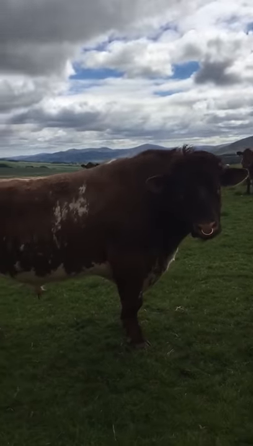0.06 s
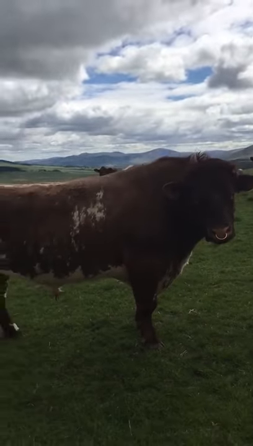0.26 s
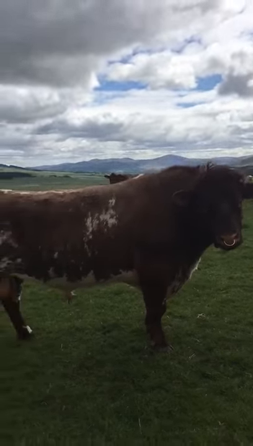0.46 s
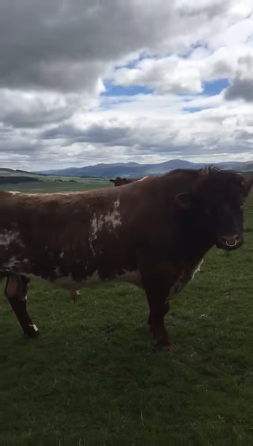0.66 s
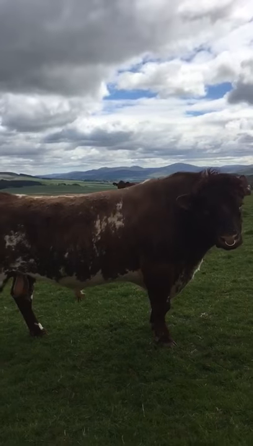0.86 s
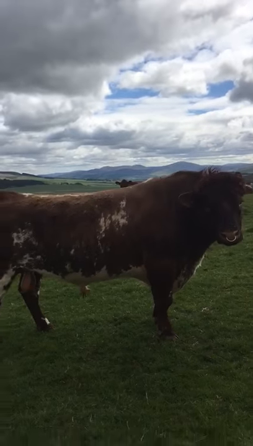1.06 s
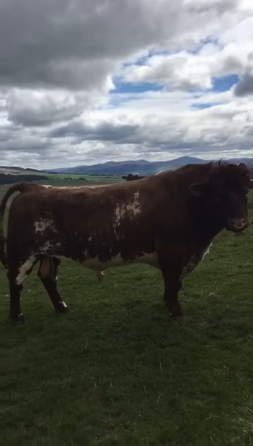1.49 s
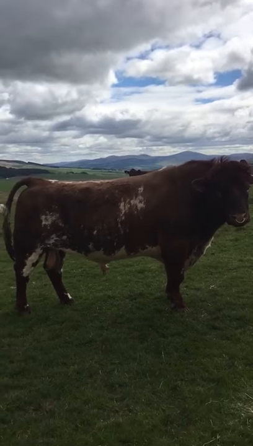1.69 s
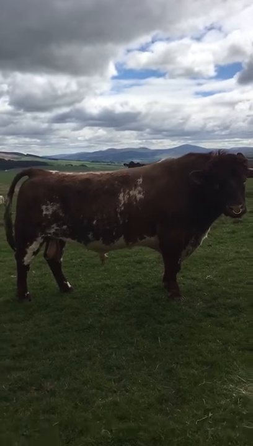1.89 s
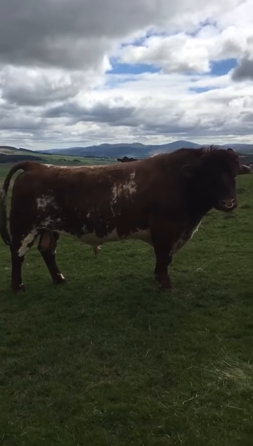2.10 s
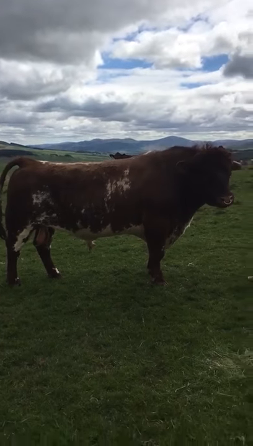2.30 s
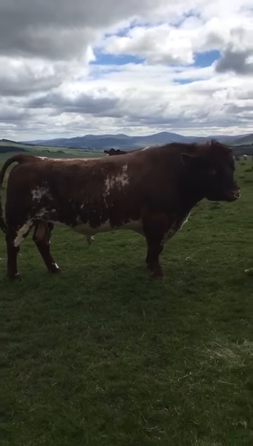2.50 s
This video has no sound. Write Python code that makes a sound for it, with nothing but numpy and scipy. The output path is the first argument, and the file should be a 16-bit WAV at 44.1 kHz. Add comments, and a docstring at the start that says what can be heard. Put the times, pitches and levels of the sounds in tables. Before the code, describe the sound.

A bull gives one long, thin, nasal bellow behind wind buffeting the microphone.

```python
"""A windy pasture on one mono microphone, with a bull heard behind the wind on the capsule.
At the start an earlier hoarse call dies away; grass rustles faintly and eddies slap the microphone.
The bull draws air, the turf scuffs once, and at 1.7 s he gives one long, thin, nasal bellow:
his vocal folds creak slowly, lock onto a steady pitch and turn raspy as the call fades.
The wind rumbles on to the end."""
import sys
import numpy as np
from scipy import signal
from scipy.io import wavfile
from scipy.ndimage import uniform_filter1d

SR = 44100
rng = np.random.default_rng(int(sys.argv[2]) if len(sys.argv) > 2 else 0)


def unload_audio(sound):
    """Save the sound as a 16-bit wav file, at the path given as the first command line argument."""
    columns = np.transpose(np.atleast_2d(sound))
    # keep every value between -1 and 1, then stretch to whole-number steps
    steps = np.round(np.clip(columns, -1, 1) * 32767)
    wavfile.write(sys.argv[1], SR, steps.astype(np.int16))


N = 116865
T = np.arange(N) / SR


def amp(db):
    """Decibels to gain."""
    return 10 ** (np.asarray(db) / 20)


def unit(x):
    """Scales to rms 1."""
    return x / np.sqrt(np.mean(x ** 2) + 1e-20)


def curve(rows):
    """Every column of a timed table, drawn at each sample."""
    times, *columns = np.transpose(rows)
    return [np.interp(T, times, column) for column in columns]


def colour(x, points, size=16384):
    """Minimum-phase filter through the given (Hz, dB) points."""
    hz, db = np.transpose(points)
    bin_hz = abs(np.fft.fftfreq(size, 1 / SR))
    log_gain = np.log(amp(np.interp(np.log(bin_hz + 1), np.log(hz), db)))
    response = np.exp(np.conj(signal.hilbert(log_gain)))
    taps = np.fft.ifft(response).real[:size // 2]
    return signal.fftconvolve(x, taps)[:len(x)]


def noise(points):
    """Steady noise of the given colour, rms 1."""
    return unit(colour(rng.standard_normal(N + SR), points)[SR:])


def levelled(x, steady_s=0.07):
    """Takes the slow swings out of a noise, leaving its quick lumps."""
    window = signal.windows.hann(2 * int(steady_s * SR) + 1)
    return x / np.sqrt(signal.fftconvolve(x ** 2, window / window.sum(), "same") + 1e-6)


def flicker(spread_db, samples):
    """A random gain that wavers over the given number of samples."""
    return amp(spread_db * unit(uniform_filter1d(rng.standard_normal(N), samples)))


def swell(centre_s, length_s, db):
    """A bell-shaped envelope centred on a moment."""
    return amp(db) * np.exp(-2 * ((T - centre_s) / length_s) ** 2)


def add(mix, start_s, sound):
    """Mixes a sound in at a time."""
    part = mix[max(round(start_s * SR), 0):][:len(sound)]
    part += sound[:len(part)]


# Gusts on the capsule. Each row: time in seconds, rumble level in dB, flutter level in dB.
WIND_LEVELS = [(0, -32.5, -46), (.1, -37, -50.5), (.21, -34.5, -52.5), (.245, -12, -38.5),
               (.28, -25.5, -54), (.315, -29.5, -57.5), (.385, -13, -41.5), (.45, -26, -45),
               (.53, -26.5, -45.5), (.58, -14.5, -38), (.63, -19.5, -42.5), (.7, -21.5, -32.5),
               (.75, -23, -39.5), (.82, -8.5, -18.5), (.87, -16.5, -28), (.93, -24, -38.5),
               (1.025, -15.5, -26), (1.15, -22, -38), (1.2, -17, -40.5), (1.28, -23, -47),
               (1.39, -24.5, -34.5), (1.45, -19.5, -42.5), (1.56, -17.5, -41), (1.6, -30.5, -52),
               (1.64, -21, -43), (1.74, -24.5, -40), (1.83, -35, -50), (1.905, -23, -32.5),
               (1.94, -14, -23.5), (2.01, -11.5, -22.5), (2.055, -25.5, -50.5), (2.09, -18.5, -31),
               (2.14, -22, -41), (2.19, -17, -21), (2.25, -18, -34.5), (2.305, -31, -37.5),
               (2.35, -11.5, -29), (2.41, -43, -53.5), (2.47, -25.5, -42), (2.55, -35.5, -47),
               (2.65, -30, -51.5)]
# The wind's two colours. Each row: frequency in Hz, gain in dB.
RUMBLE_COLOUR = [(12, -20), (25, -16), (38, -14), (55, 0.5), (75, -4.5), (110, -8.5), (150, -13),
                 (220, -24.5), (400, -50.5), (900, -89.5)]
FLUTTER_COLOUR = [(70, -28), (140, -2.5), (230, 3), (330, -4.5), (480, -13), (700, -18.5), (1000, -30),
                  (1500, -36), (2500, -53.5), (5000, -66.5)]

def wind():
    """Wind right on the microphone: lumpy rumble, with a brighter flutter that flares on its crests."""
    rumble_db, flutter_db = curve(WIND_LEVELS)
    rumble = levelled(noise(RUMBLE_COLOUR))
    crests = abs(signal.hilbert(rumble)) + 0.2
    flares = flicker(spread_db=2.2, samples=int(.012 * SR))
    flutter = colour(crests * flares * rng.standard_normal(N), FLUTTER_COLOUR)
    return amp(rumble_db) * rumble + amp(flutter_db) * levelled(unit(flutter))


# The end of an earlier call. Each row: time in seconds, level in dB.
HOARSE_LEVELS = [(0, -55), (.17, -56), (.26, -60.5), (.33, -81), (.45, -65.5), (.58, -60.5), (.75, -64.5),
                 (.9, -64.5), (1.1, -80.5), (1.3, -76)]
# The throat that shapes it. Each row: frequency in Hz, gain in dB.
HOARSE_THROAT = [(600, -12), (1100, -9.5), (1350, -2), (1620, -6), (1730, 3), (1840, -6), (2000, -20.5),
                 (2250, -18.5), (2650, -11), (3130, -7.5), (3450, -18.5), (4200, -23), (4380, -16.5),
                 (4560, -30.5), (4900, -40)]

def hoarse_call():
    """Unvoiced air through the bull's throat, dying away behind the wind."""
    return amp(curve(HOARSE_LEVELS)[0]) * noise(HOARSE_THROAT)


# The pasture's background. Each row: frequency in Hz, gain in dB.
AIR_COLOUR = [(100, 10), (1000, 11.5), (2500, 2.5), (5000, -12.5), (7500, -9.5), (9400, -4.5),
              (10600, -16.5), (12000, -27)]

def field_air(level_db=-63):
    """The still air of the field, a steady hush under everything."""
    return amp(level_db) * noise(AIR_COLOUR)


# Rustles in the grass. Each row: centre in seconds, length in seconds, level in dB.
GRASS_RUSTLES = [(0.034, 0.12, -66), (0.198, 0.065, -65), (0.567, 0.064, -66), (0.718, 0.12, -72.5),
                 (0.896, 0.087, -65.5), (1.044, 0.17, -70.5), (1.25, 0.069, -68.5), (1.443, .025, -56),
                 (2.11, 0.084, -65), (2.6, .12, -75)]
# Their hiss. Each row: frequency in Hz, gain in dB.
GRASS_COLOUR = [(1500, -13), (3500, -2), (6000, 1.5), (7500, 0.5), (9400, 5.5), (10400, 2.5), (11500, 1)]

def grass():
    """Grass rustles in soft, grainy swishes, faint at the microphone."""
    swishes = sum(swell(*row) for row in GRASS_RUSTLES)
    grains = flicker(spread_db=4, samples=90)
    return swishes * unit(grains * noise(GRASS_COLOUR))


# Single eddies on the capsule. Each row: start in seconds, gain in dB, pitch in Hz.
EDDIES = [(.132, -15.5, 170), (0.234, -9, 75), (0.341, -21, 167), (0.374, -3.5, 58), (.481, -15.5, 200),
          (.567, -23, 292), (0.572, -7, 60.2), (.644, -18, 230), (.686, -12.5, 185), (0.766, -23.5, 240),
          (.805, -2.5, 110), (.8093, 7.5, 380), (0.8123, -0.5, 844), (0.8137, -3, 130), (0.8225, -7.5, 130),
          (.951, -14.5, 260), (.989, -35, 260), (1.037, -14, 300), (1.058, -22.5, 230), (1.104, -15, 260),
          (1.142, -31, 250), (1.207, -16.5, 210), (1.254, -23, 290), (1.41, -19.5, 290),
          (1.461, -12.5, 560), (1.548, -14.5, 248), (1.627, -17.5, 260), (1.73, -26.5, 400),
          (1.979, -11, 294), (2.011, -12.5, 270), (2.184, -1, 142), (2.211, -17, 300), (2.324, -26, 300)]

def buffets(rise_cycles=0.077, decay_cycles=.62, top_hz=1900):
    """Each eddy slaps the microphone with a pressure kick that dies within a cycle or two."""
    kicks = np.zeros(N)
    for start_s, db, hz in EDDIES:
        cycles = hz * T[:SR // 10]
        envelope = np.exp(-cycles / decay_cycles) * (1 - np.exp(-cycles / rise_cycles))
        add(kicks, start_s, amp(db) * np.sin(2 * np.pi * cycles) * envelope)
    return signal.sosfilt(signal.butter(4, top_hz, fs=SR, output="sos"), kicks)


# The bull's breath. Each row: time in seconds, level in dB.
INTAKE_LEVELS = [(1.18, -72.5), (1.28, -64), (1.35, -54.5), (1.42, -56), (1.54, -52.5), (1.66, -58),
                 (1.8, -58.5), (2.1, -58.5), (2.25, -67)]
# His airway. Each row: frequency in Hz, gain in dB.
AIRWAY_COLOUR = [(1200, 2.5), (2100, -5.5), (2600, 4), (3050, -6), (3650, -10.5), (4550, 0), (4950, -7.5),
                 (5650, -1.5), (6250, -9), (8000, -11), (8750, -8), (10400, -13), (12000, -17)]

def intake():
    """The bull draws air through throat and nostrils; the hiss lingers under the bellow."""
    return amp(curve(INTAKE_LEVELS)[0]) * noise(AIRWAY_COLOUR)


# Scuffed turf. Each row: frequency in Hz, gain in dB.
TURF_COLOUR = [(500, -17), (1000, 6), (1600, 8), (2300, -2), (3200, -21), (6000, -35)]

def scuff():
    """One short, dull scuff down in the turf."""
    return swell(centre_s=1.35, length_s=.018, db=-49) * noise(TURF_COLOUR)


# Unevenness of the fold pulses. Each row: time in seconds, scale of the unevenness in dB.
PULSE_UNEVENNESS = [(1.72, .3), (1.755, 2.6), (1.82, 2), (1.87, 1.2), (1.93, .5), (2.2, .4), (2.4, .8),
                    (2.65, 1)]

def fold_pulses(times, jitter_s=.000014, third_pulse_drop=2.5):
    """The vocal folds give one sharp, uneven pulse a cycle, every third one weaker."""
    uneven_db = np.interp(times, *np.transpose(PULSE_UNEVENNESS))
    strength, shift = rng.standard_normal((len(times), 2)).T
    every_third = np.arange(len(times)) % 3 == 1
    strength = np.clip(strength, -2, 1) - third_pulse_drop * every_third
    pulses, offsets = np.zeros(N), np.arange(-20, 21)
    for time_s, db in zip(times + jitter_s * shift, uneven_db * strength):
        samples = round(time_s * SR) + offsets
        pulse = np.sinc(samples - time_s * SR) * np.hanning(len(offsets))  # can fall between samples
        add(pulses, samples[0] / SR, amp(db) * pulse)
    return pulses


# The creaky start, then the held note's rise and fall. Each row: time in seconds, pulse rate in Hz.
CREAK_PITCH = [(1.698, 52), (1.734, 60), (1.749, 68), (1.7495, 120), (1.757, 128), (1.759, 146),
               (1.78, 141), (1.825, 144)]
RISING_PITCH = [(1.85, 145.4), (1.882, 144.3), (2.02, 147.2), (2.054, 146.8), (2.1, 148.4), (2.14, 147.6)]
FALLING_PITCH = [(2.17, 147.0), (2.268, 144.8), (2.476, 144.2), (2.5, 145.3), (2.526, 143.2),
                 (2.574, 143.8), (2.612, 142.1), (2.65, 142.0)]
# The voice at the microphone. Each row: time in seconds, then main, upper and bright levels in dB.
VOICE_LEVELS = [(1.69, -45.5, -61, -68), (1.755, -39, -47, -48.5), (1.785, -39.5, -63, -59.5),
                (1.835, -37.5, -53.5, -50), (1.92, -36, -52.5, -69.5), (1.99, -39, -50, -68),
                (2.12, -40, -62, -66), (2.22, -44.5, -65, -69), (2.31, -47.5, -70.5, -71.5),
                (2.45, -49.5, -69.5, -72), (2.57, -45.5, -58, -75), (2.65, -51, -65, -77)]
# Its rougher side. Each row: time in seconds, then wheeze, rasp and nasal levels in dB.
ROUGH_LEVELS = [(1.69, -61.5, -54, -73), (1.81, -72, -41.5, -58.5), (1.93, -86.5, -49.5, -71),
                (2.2, -71.5, -77, -63), (2.29, -70.5, -56, -84), (2.42, -59, -48.5, -59),
                (2.49, -61, -49.5, -64), (2.55, -66.5, -47.5, -55), (2.6, -67, -46, -51.5),
                (2.65, -59, -47.5, -49)]
# Resonances of throat and nose for those six layers. Each row: frequency in Hz, gain in dB.
MAIN_COLOUR = [(300, -43), (1040, -33.5), (1170, -18), (1315, 7.5), (1460, -2), (1600, -2), (1760, 6.5),
               (1900, -2), (2050, -5.5), (2220, -6), (2400, -19.5), (3000, -56)]
UPPER_COLOUR = [(1800, -42), (2400, -3.5), (2700, 3), (3050, -8), (3450, -9.5), (3950, -23.5), (4450, -23),
                (4950, -35), (12000, -41)]
BRIGHT_COLOUR = [(2200, -46), (3000, -12), (3300, 11), (3600, 8), (3950, -7), (4400, 0.5), (4700, -19),
                 (5000, -30), (5700, -17.5), (9000, -22), (12000, -46.5)]
WHEEZE_COLOUR = [(4200, -31), (5100, -29), (5550, 5.5), (5900, -1.5), (6250, -10), (6700, -0.5), (7100, -9),
                 (7600, -28), (9500, -12.5), (12000, -50)]
RASP_COLOUR = [(500, -38), (1000, -13.5), (1130, -5.5), (1290, 3.5), (1650, -5.5), (1950, -4), (2250, -16),
               (3200, -18), (4200, -26.5), (8000, -40.5)]
NASAL_COLOUR = [(300, -57), (480, -25.5), (585, -3), (720, -15), (1000, -55)]

def bellow(start_s=1.697, puff_decay_cycles=.3, puff_floor=.35, wheeze_air=.45):
    """Out in the pasture, fold pulses ring the bull's throat; puffs of air in each cycle add the rasp."""
    calling = T >= start_s
    pitch_hz = curve([*CREAK_PITCH, *RISING_PITCH, *FALLING_PITCH])[0]
    cycles = np.cumsum(pitch_hz * calling) / SR
    pulse_times = np.interp(np.arange(int(cycles[-1]) + 1), cycles[calling], T[calling])
    pulses = fold_pulses(pulse_times)
    airflow = puff_floor + np.exp(-(cycles % 1) / puff_decay_cycles)
    puffs = calling * airflow * rng.standard_normal(N)
    breathy_pulses = unit(pulses) + wheeze_air * unit(puffs)
    main_db, upper_db, bright_db = curve(VOICE_LEVELS)
    wheeze_db, rasp_db, nasal_db = curve(ROUGH_LEVELS)
    layers = [(pulses, MAIN_COLOUR, main_db),
              (pulses, UPPER_COLOUR, upper_db),
              (pulses, BRIGHT_COLOUR, bright_db),
              (breathy_pulses, WHEEZE_COLOUR, wheeze_db),
              (puffs, RASP_COLOUR, rasp_db),
              (pulses, NASAL_COLOUR, nasal_db)]
    voice = sum(amp(db) * unit(colour(drive, shape)) for drive, shape, db in layers)
    return np.sqrt(calling.mean()) * voice  # the levels are rms over the call alone


def scene():
    """The wind, the field and the bull, as they reach one microphone."""
    return (wind() + hoarse_call() + field_air() + grass() + buffets() + intake() + scuff() + bellow())[None]


def record(dry, low_cut_hz=26.5, headroom=.98, top_hz=12000):
    """The microphone's low cut, its soft overload in the hardest buffet, and its treble limit."""
    thinned = signal.sosfilt(signal.butter(2, low_cut_hz, "high", fs=SR, output="sos"), dry)
    limited = headroom * np.tanh(thinned / headroom)
    lowpass = signal.firwin(511, top_hz, window=("kaiser", 9), fs=SR)
    return signal.oaconvolve(limited, lowpass[None], "same")


dry = scene()
out = record(dry)
unload_audio(out)
```